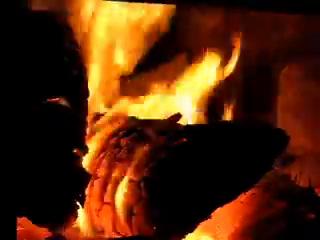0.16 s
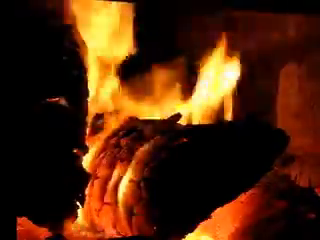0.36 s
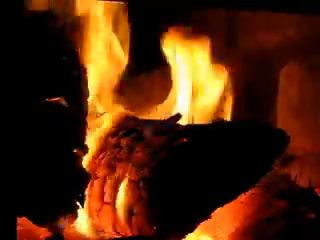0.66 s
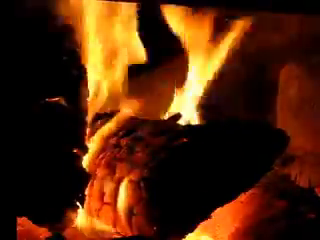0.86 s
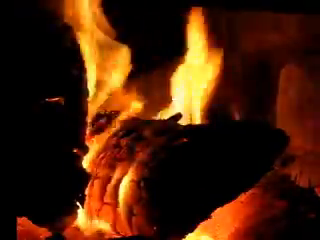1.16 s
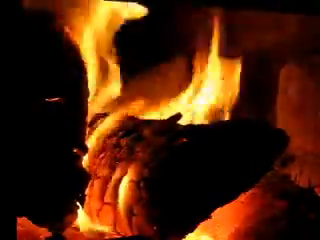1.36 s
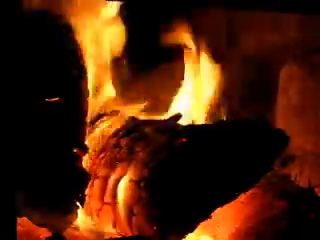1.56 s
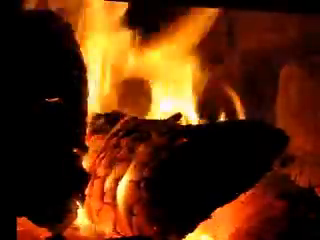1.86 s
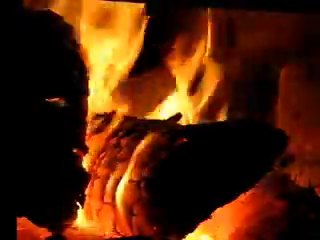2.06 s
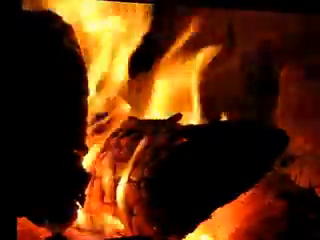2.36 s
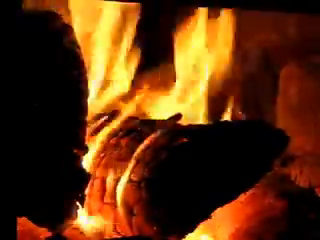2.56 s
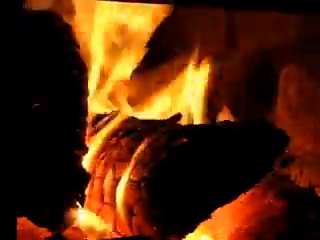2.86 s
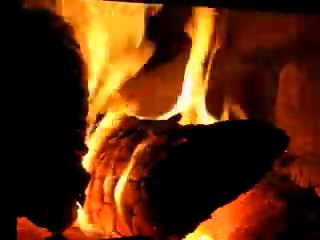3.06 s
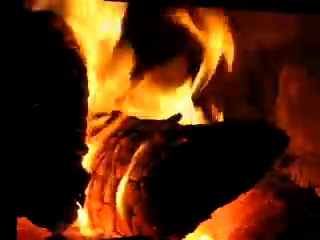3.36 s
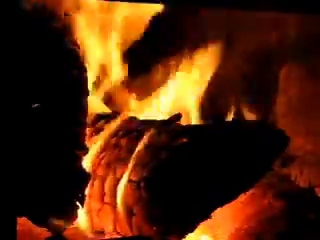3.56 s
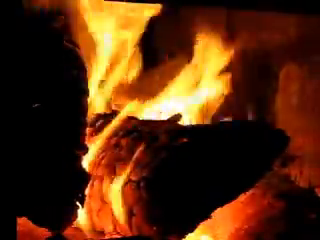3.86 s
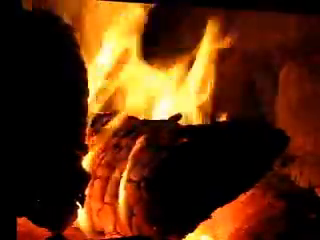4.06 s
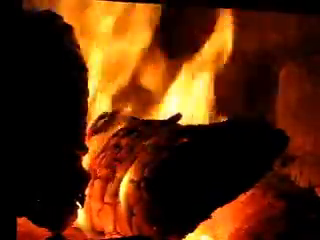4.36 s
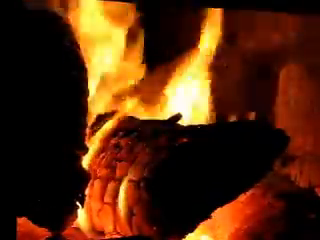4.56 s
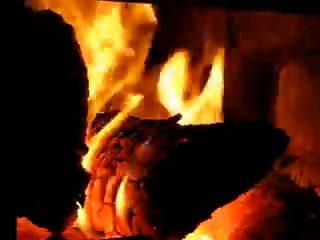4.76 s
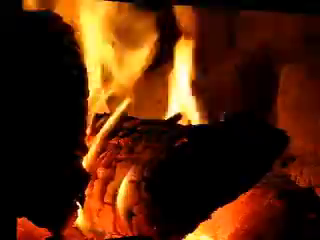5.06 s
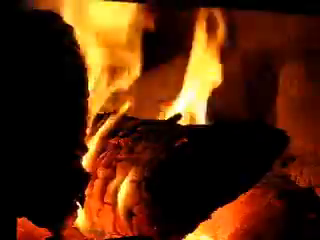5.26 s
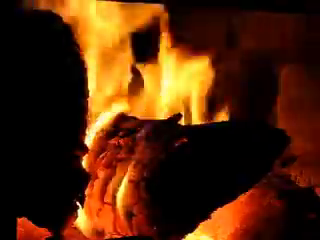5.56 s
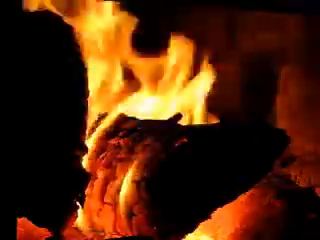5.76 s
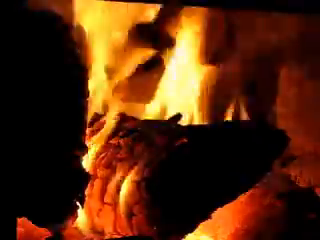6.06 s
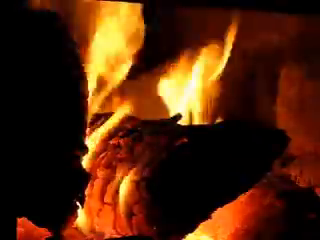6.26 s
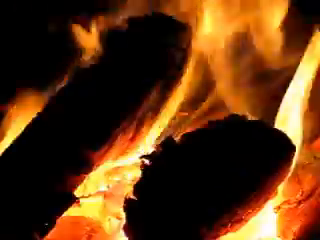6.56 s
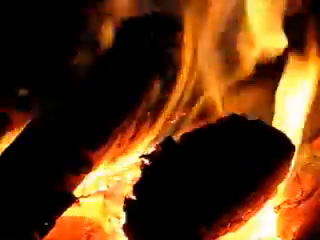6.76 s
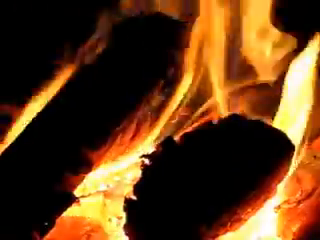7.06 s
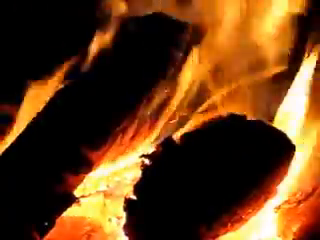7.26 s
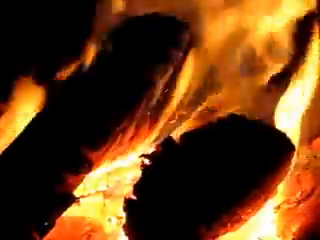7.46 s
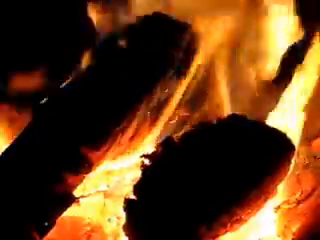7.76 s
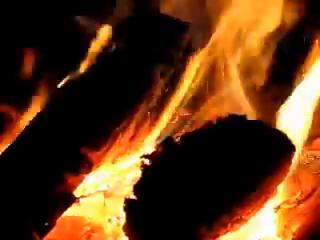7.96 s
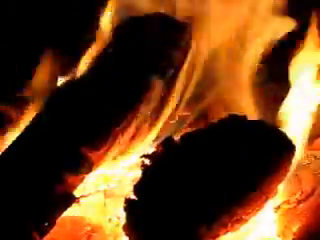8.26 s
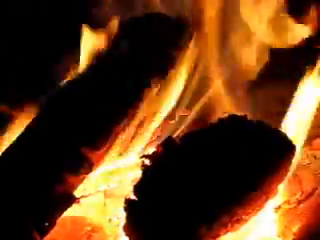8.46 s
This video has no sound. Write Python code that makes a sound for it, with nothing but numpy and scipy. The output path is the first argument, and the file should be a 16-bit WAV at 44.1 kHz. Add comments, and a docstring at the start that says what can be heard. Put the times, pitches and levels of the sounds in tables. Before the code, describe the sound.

A log fire burns close by in a brick fireplace, with a short living-room echo. A deep, wavering rumble swells and sinks beneath a soft rush, fine steam hiss and barely audible low hum, while tiny ember ticks fall at random. Bright ticks and gritty bark rasps gather from 0.5 to 1.8 s, with a strong tick near 1.95 s. A very loud, sharp pop cracks at 2.0 s, another at 2.17 s. Then it is sparser: a dull double pop with a low flap at 3.7 s, ticks and a flap from 4.5 to 4.9 s, a rasp at 5.8 s and a bright pop at 6.4 s. At 6.5 s everything abruptly becomes quieter. Wet sap sputters until about 7.2 s, a loud crack strikes at 7.25 s, then crisp ticks come near 8 s and soft flaps near 8.4 s as rumble and hiss slowly build.

```python
"""Log fire in a brick fireplace

Logs burn close by in a living room. Filtered noise makes the rumble of the flames and the rush and hiss
of gas and steam; a wavering tone hums faintly below. Embers tick, bark rasps, flames flap and sap spits:
each is a short patter of noise through a resonance. Gas pockets burst with sharp pops that ring the air
in the firebox, and the room adds echoes. At 6.5 s the sound cuts abruptly to a quieter spell of the fire."""
import sys
import numpy as np
from scipy import signal
from scipy.fft import rfft, irfft, next_fast_len
from scipy.io import wavfile
from scipy.ndimage import uniform_filter1d

SR = 44100
rng = np.random.default_rng(int(sys.argv[2]) if len(sys.argv) > 2 else 0)


def digitize_waveform(pressure):
    """Quantize a signal to 16-bit integers and store it at the path in sys.argv[1].

    Rows of a 2-D input are taken as channels; values are limited to [-1, 1].
    """
    field = np.atleast_2d(pressure).T
    bounded = np.clip(field, -1, 1)
    quanta = np.round(bounded * 32767).astype(np.int16)
    wavfile.write(sys.argv[1], SR, quanta)


N = 380583
T = np.arange(N) / SR  # time of every sample [s]
SHORT_T = T[:4096]  # time within one short sound [s]

# the quieter spell starts here
CUT_S = 6.505

# a faint hum; it wavers at random and is weaker after the cut
HUM_HZ, HUM_DB, HUM_DROP_DB = 119, -59, 5.5

# rush and hiss drop at the cut, then build up again
RUSH_DB, RUSH_DROP_DB, RUSH_RISE_DB_PER_S = -57.5, 6.5, 2
HISS_DB, HISS_DROP_DB, HISS_RISE_DB_PER_S = -59.5, 8.5, 2.2
# tone colour of the rushing gas: (frequency [Hz], relative level [dB])
RUSH_COLOUR = [(130, -11.5), (220, -14), (241, -4.5), (276, 0.5), (358, -2.5), (463, 2.5), (638, -6.5),
               (843, -2), (897, 0), (984, -7), (1140, -5.5), (1270, -9), (1490, -9.5), (1850, -8.5),
               (2600, -17.5), (3380, -31), (5720, -120)]
# tone colour of the hissing steam: (frequency [Hz], relative level [dB])
HISS_COLOUR = [(1290, -25), (2200, 4.5), (5440, 2), (7470, 1), (7810, -1), (9210, 4.5), (9750, -4.5),
               (10000, -48), (13000, -34), (22000, -120)]
# small steam jets, each with its own pitch [Hz]
JETS_HZ = (2500, 3100, 3900, 4900, 6100, 7400, 9000)
# stereo width of the steady sounds: (frequency [Hz], side level minus mid level [dB])
STEREO_WIDTH = [(60, -26), (110, -30.5), (190, -9.5), (330, -10.5), (580, -9), (1020, -0.5), (1800, -11),
                (3170, -24.5), (5580, -23.5), (9830, -19.5)]

# the rumble rises and falls slowly, drops abruptly at the cut, then partly recovers: (time [s], level [dB])
RUMBLE_LEVEL = [(0, -45.5), (.7, -45.5), (1.3, -48.5), (1.7, -44.5), (2.5, -48), (3.0, -44), (4.3, -44.5),
                (5.2, -46.5), (6.45, -44.5), (6.56, -56.5), (7.25, -52), (8.63, -49)]
# tone colour of the burning: (frequency [Hz], relative level [dB])
RUMBLE_COLOUR = [(12, -15.5), (22, -0.5), (32, -5), (43, -6), (56, 4), (69, -0.5), (84, -5.5), (100, -11),
                 (130, -9.5), (160, -15), (240, -26.5), (400, -48.5)]
# the flames leap at random about that level
LEAPS_PER_S, LEAP_DB = 11, 2.5

# faint ticks fall at random and are softer after the cut; the strongest stand EMBER_SPREAD_DB above the weakest
EMBERS_PER_S, EMBER_DB, EMBER_SPREAD_DB, EMBER_DROP_DB = 16, -62.5, 12, 2.5
# the loudest ember ticks: (time [s], level before a shared trim [dB], pitch [Hz])
LOUD_TICKS = [(0.522, -36, 9650), (0.9375, -35, 6700), (1.0281, -36.5, 7840), (1.3352, -29, 9100),
              (1.6614, -40, 7030), (1.9595, -24, 8700), (2.338, -35, 9260), (4.0637, -42, 4820),
              (4.5515, -34, 6300), (4.771, -36.5, 7500), (4.9144, -39, 9360), (6.0395, -36, 4500),
              (7.774, -39, 8860), (7.998, -34, 5470), (8.0937, -32, 9000), (8.5048, -40.5, 2980)]
TICK_FADE_S = .003  # how fast the patter dies

# bark fibres tearing: (time [s], level before a shared trim [dB], pitch [Hz],
# first filter's bandwidth over pitch [ratio], patter fade time [s])
BARK_RASPS = [(.795, -46.5, 3800, 0.99, 0.044), (1.284, -41.5, 3670, 0.15, 0.0034),
              (1.5783, -32, 6360, 1.7, 0.0048), (1.772, -50, 2800, .9, 0.033),
              (5.7943, -35, 5830, 1.2, 0.012), (6.6397, -57.5, 2970, 2.4, 0.00088)]
# flames flapping: (time [s], level before a shared trim [dB], pitch [Hz],
# first filter's bandwidth over pitch [ratio], patter fade time [s])
FLAME_FLAPS = [(.152, -54, 260, 1.6, 0.013), (1.517, -54, 330, 0.53, 0.0076),
               (2.436, -48.5, 410, 1.4, .012), (3.728, -39, 304, 0.34, 0.0091),
               (4.760, -43.5, 318, 0.76, 0.018), (6.286, -49, 280, 0.75, 0.013),
               (8.345, -55, 804, .4, 0.0086), (8.400, -55.5, 815, 0.34, .008)]

# runs of boiling sap: (start [s], length [s], level [dB], upper resonance relative to lower [dB])
SAP_RUNS = [(1.733, .08, -49.5, -5), (6.561, .44, -56.5, -0.5), (7.046, .08, -54, -3),
            (7.158, .08, -54.5, -5)]
# within a run the spits come unevenly and differ in strength and colour
SPIT_GAP_S, SPIT_JITTER_S, SPIT_SPREAD_DB, SPIT_COLOUR_DB = 0.048, .018, 2, 3

# bursting gas pockets: (time [s], level [dB], crack pitch [Hz], crack bandwidth [Hz], splinters [dB],
# drive of low firebox modes [dB], drive of middle modes [dB], drive of high modes [dB])
GAS_POCKETS = [(2.0039, -12.5, 2870, 1000, -10.5, -4.5, -6, -1.5),
               (2.1668, -20.5, 2800, 900, -15.5, 8, -9, -1), (3.7278, -30, 1390, 695, -48, -24, -32, -14),
               (3.7301, -32.5, 2160, 2000, -50, -18, -22, 4), (6.3964, -19, 3540, 4930, -5, 6, 5, -21),
               (7.245, -15, 2780, 2800, -3.5, -0.5, -5, -2.5)]
# standing waves in the air between the bricks: (frequency [Hz], relative level [dB], time to fall 60 dB [s])
FIREBOX_MODES = [(446.5, -5, 0.089), (478, -12, 0.069), (538, 1, 0.029), (726, 5, 0.024), (826, 3, 0.032),
                 (1113, 3, 0.02), (1290, -14.5, 0.041)]

# echoes of the room: (centre frequency [Hz], time to fall 60 dB [s], echo level [dB])
ROOM_ECHOES = [(200, 0.52, -3), (448, 0.34, -8.5), (1040, 0.44, -10.5), (1800, 0.45, -11),
               (2730, 0.49, -15.5), (4230, 0.31, -11.5), (9600, 0.32, -17)]
LATE_ECHO_DB = 3  # the room sounds a little more after the cut

# upper limits of the sound, before and after its peaks are clipped
BAND_HZ, TOP_HZ = 9700, 16000


def undb(db):
    """Turn decibels into a gain."""
    return 10 ** (np.asarray(db) / 20)


def unit(x):
    """Scale to an average (rms) strength of 1."""
    return x / np.sqrt(np.mean(x ** 2))


def after_cut(drop_db, rise_db_per_s=0):
    """Level change in dB: none before the cut, then a drop that recovers at the given rate."""
    return (T >= CUT_S) * (rise_db_per_s * (T - CUT_S) - drop_db)


def walk(rate):
    """A random level, drawn `rate` times a second and smoothed twice; its rms is near 1."""
    k = int(SR / rate)
    steps = np.repeat(rng.standard_normal(N // k + 1), k)
    smooth = uniform_filter1d(uniform_filter1d(steps, k), k)
    return unit(smooth)[:N]


def colour(x, spectrum):
    """Shape a steady sound's spectrum with (frequency, level) points."""
    size = next_fast_len(len(x))
    hz = np.fft.rfftfreq(size, 1 / SR)
    points = np.array(spectrum)
    db = np.interp(np.log(hz + 1), np.log(points[:, 0]), points[:, 1])
    return irfft(rfft(x, size) * undb(db), size)[:len(x)]


def spread(x, spectrum):
    """Colour a steady sound and add a diffuse part that differs between the ears."""
    side = colour(colour(rng.standard_normal(N), spectrum), STEREO_WIDTH)
    mid = colour(unit(x), spectrum)
    return (mid + np.array([[1], [-1]]) * side) / np.std(mid)


def band(x, hz, width):
    """A resonance with gain 1 at its centre."""
    hz = min(hz, SR / 2 - 1000)
    b, a = signal.iirpeak(hz, hz / min(width, SR / 4), fs=SR)
    return signal.lfilter(b, a, x)


def butter(x, order, hz, kind):
    """A smooth low-pass or high-pass filter."""
    return signal.sosfilt(signal.butter(order, hz, kind, fs=SR, output="sos"), x)


def elliptic(x, order, hz):
    """A steep low-pass filter."""
    return signal.sosfilt(signal.ellip(order, .2, 60, hz, fs=SR, output="sos"), x)


def add(track, s, sound):
    """Mix a sound into a track at a time."""
    i = int(s * SR)
    track[i:i + len(sound)] += sound[:N - i]


def fracture(scatter, fade_s, snap_s=0):
    """A sudden snap amid a dense, dying patter of splinters and reflections off the logs."""
    patter = rng.standard_normal(len(SHORT_T)) * np.exp(-SHORT_T / fade_s)
    push = scatter * patter / np.linalg.norm(patter)
    push[int(snap_s * SR)] = 1  # the snap replaces one sample of the patter
    return -push


def burst(x, db):
    """Set the level of a short sound, with its energy counted over 4 ms."""
    return x * undb(db) * np.sqrt(.004 * SR) / np.linalg.norm(x)


def snaps(rows, scatter, gain_db, snap_s=0):
    """Short disturbances, each shaped by a resonance and a second one twice as wide."""
    out = np.zeros(N)
    for s, db, hz, share, fade_s in rows:
        push = fracture(scatter, max(fade_s, 1 / SR), snap_s)
        ring = band(band(push, hz, hz * share), hz, 2 * hz * share)
        add(out, s, burst(ring, db + gain_db))
    return out


def hum():
    """A faint, wavering hum made of one sine tone."""
    tone = np.sqrt(2) * np.sin(2 * np.pi * HUM_HZ * T)
    return tone * undb(HUM_DB + after_cut(HUM_DROP_DB) + 2.9 * walk(5.3))


def gas_rush():
    """Hot gas streams out in a smooth rush of coloured noise."""
    level_db = RUSH_DB + after_cut(RUSH_DROP_DB, RUSH_RISE_DB_PER_S)
    return spread(rng.standard_normal(N), RUSH_COLOUR) * undb(level_db + 0.65 * walk(18))


def steam_hiss():
    """Escaping steam hisses in noise, tiny bursts and fluttering jets, with a thin whistle of narrow noise."""
    level_db = HISS_DB + after_cut(HISS_DROP_DB, HISS_RISE_DB_PER_S)
    # about 900 tiny bursts a second, of either sign and uneven strength
    happens = rng.random(N) < 900 / SR
    strength = undb(4.5 * np.minimum(rng.exponential(size=N), 5))
    grains = happens * rng.choice([-1, 1], N) * strength
    sizzle = rng.standard_normal(N) + 0.69 * unit(grains)
    jets = np.zeros(N)
    for hz in JETS_HZ:
        jet = unit(band(rng.standard_normal(N), hz, hz / 5))
        jets += jet * undb(2.5 * walk(25))
    hiss = spread(unit(sizzle) + 0.46 * unit(jets), HISS_COLOUR) * undb(level_db + .5 * walk(30))
    whistle = unit(band(rng.standard_normal(N), 7860, 110))
    return hiss + whistle * undb(level_db - 10.5 + 2 * walk(2.4))


def flames():
    """Turbulent burning rumbles in the hearth, swelling and sinking as the flames leap."""
    rumble = spread(rng.standard_normal(N), RUMBLE_COLOUR)
    # even out the noise's own swelling, so the level table and the leaps set the level
    swell = np.sqrt(uniform_filter1d(rumble[0] ** 2, size=SR // 7))
    points = np.array(RUMBLE_LEVEL)
    level_db = np.interp(T, points[:, 0], points[:, 1])
    return rumble / swell * undb(level_db + LEAP_DB * walk(LEAPS_PER_S))


def embers():
    """Faint ticks from the ember bed fall at random; most are tiny."""
    rows = []
    for when, size, pitch in rng.random((int(EMBERS_PER_S * N / SR), 3)):
        db = EMBER_DB + EMBER_SPREAD_DB * size ** 3
        rows.append((when * T[-1], db, 3000 * 3 ** pitch, .8, .001))
    return snaps(rows, scatter=0.75, gain_db=-0.5) * undb(after_cut(EMBER_DROP_DB))


def ticks():
    """Dry, bright ticks: a snap about 1 ms into a short, dying patter of noise."""
    rows = [(s, db, hz, 1.0, TICK_FADE_S) for s, db, hz in LOUD_TICKS]
    return snaps(rows, scatter=1.0, gain_db=-9.3, snap_s=0.0011)


def rasps():
    """Bark fibres tear in short, gritty patters."""
    return snaps(BARK_RASPS, scatter=7.8, gain_db=0.5)


def flaps():
    """Flames flap in short, low puffs of noise."""
    return snaps(FLAME_FLAPS, scatter=6.1, gain_db=2)


def spits():
    """Sap boils out in runs of wet puffs through a crack in the log that has two resonances."""
    out = np.zeros(N)
    for s, length, db, upper_db in SAP_RUNS:
        for late, size, bright in rng.uniform(-1, 1, (round(length / SPIT_GAP_S), 3)):
            push = fracture(2.8, 0.0068)
            low = unit(band(band(push, 1220, 350), 1220, 350))
            high = unit(band(band(push, 2600, 1200), 2600, 1200))
            puff = low + undb(upper_db + SPIT_COLOUR_DB * bright) * high
            add(out, s, burst(puff, db + SPIT_SPREAD_DB * size))
            s += SPIT_GAP_S + SPIT_JITTER_S * late
    return out


def firebox_ring(drive_db):
    """Standing waves between the bricks ring and fade, each driven by its own amount."""
    ring = np.zeros(len(SHORT_T))
    for hz, mode_db, t60 in FIREBOX_MODES:
        # where the pocket lies decides which standing waves it drives
        drive = np.interp(hz, [450, 820, 1120], drive_db)
        fade = undb(mode_db + drive - 60 * SHORT_T / t60)
        ring += fade * np.cos(2 * np.pi * hz * SHORT_T)
    return ring


def pops():
    """Each gas pocket cracks open, throws bright splinters and rings the air in the firebox."""
    out = np.zeros(N)
    for s, db, hz, width, splinter_db, *drive_db in GAS_POCKETS:
        push = fracture(0.45, 0.0089)
        # a bigger, lower pocket also opens more slowly, which dulls its crack
        crack = butter(band(push, hz, width), 4, 1.68 * hz, "low")
        splinters = undb(splinter_db) * band(push, 8040, 3900)
        ring = undb(-38.0) * firebox_ring(drive_db)
        add(out, s, burst(crack + splinters - ring, db))
    # so small a source radiates little bass
    return butter(out, 2, 170, "high")


def room(x):
    """Diffuse echoes build up within a few milliseconds and die at a different pace in each pitch range."""
    t = T[:SR * 3 // 4]
    log_hz = np.log(np.fft.rfftfreq(len(t), 1 / SR) + 1)
    centres = np.log(np.array(ROOM_ECHOES)[:, 0])
    noise = rfft(rng.standard_normal((2, len(t))))
    tail = np.zeros((2, len(t)))
    # each row of the identity matrix picks one pitch range, blending into its neighbours
    for pick, (_, t60, db) in zip(np.eye(len(ROOM_ECHOES)), ROOM_ECHOES):
        fade = undb(-60 * t / t60) * (1 - np.exp(-t / 0.001))
        part = irfft(noise * np.interp(log_hz, centres, pick), len(t))
        tail += part * fade * undb(db) / np.linalg.norm(fade)
    # the first reflections off the side walls of the hearth reach the two ears differently
    walls = rng.standard_normal(len(t)) * np.exp(-t / 0.004)
    sideways = tail[1] + undb(-4) * walls / np.linalg.norm(walls)
    mid = signal.fftconvolve(x, tail[0])[:N]
    side = signal.fftconvolve(x, sideways)[:N]
    side = band(band(side, 1100, 2000), 1100, 3500)
    return mid + np.array([[1], [-1]]) * undb(-9.5) * side


def scene():
    """The crackle and its echoes over the steady burning; no echo carries across the cut."""
    steady = hum() + gas_rush() + steam_hiss() + flames()
    crackle = embers() + ticks() + rasps() + flaps() + spits() + pops()
    early = T < CUT_S
    early_echoes = room(crackle * early) * early
    late_echoes = undb(LATE_ECHO_DB) * room(crackle * ~early)
    return steady + crackle + early_echoes + late_echoes


def record(dry):
    """Trim the treble, then clip any peak that is too strong, which throws a little treble above the band."""
    narrow = elliptic(dry, 10, BAND_HZ)
    clipped = np.clip(narrow, -.85, .85)
    return elliptic(clipped, 8, TOP_HZ)


dry = scene()
out = record(dry)
digitize_waveform(out)
```